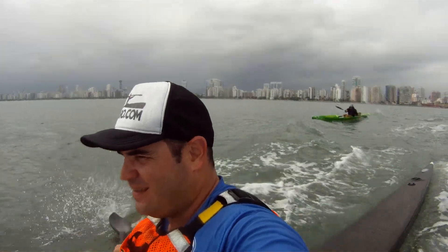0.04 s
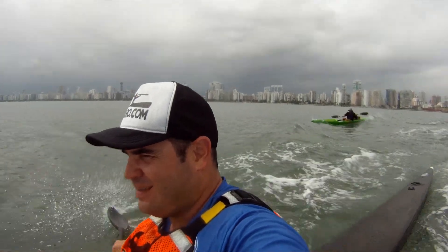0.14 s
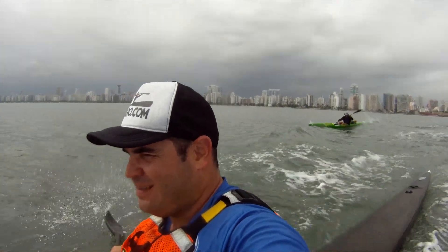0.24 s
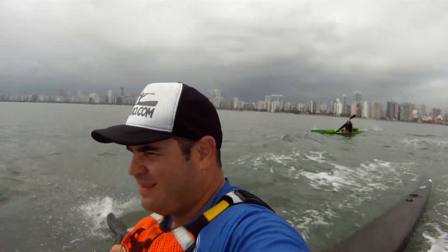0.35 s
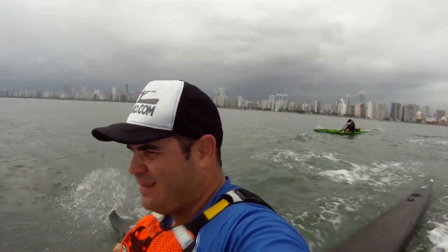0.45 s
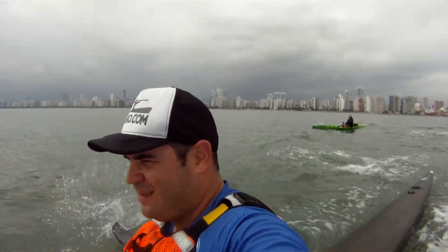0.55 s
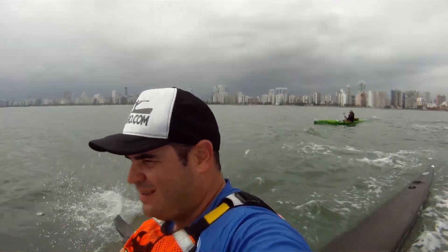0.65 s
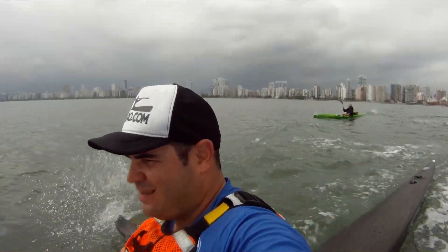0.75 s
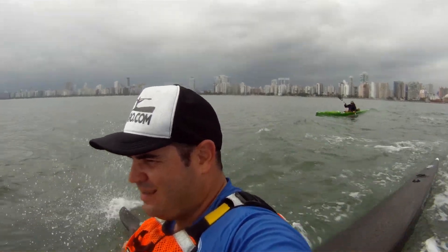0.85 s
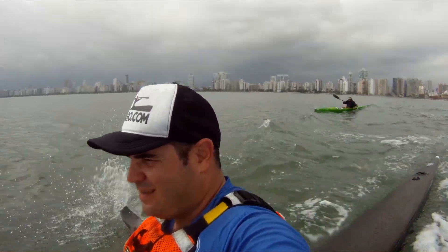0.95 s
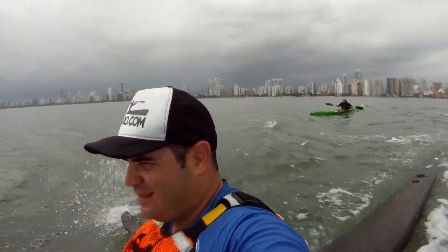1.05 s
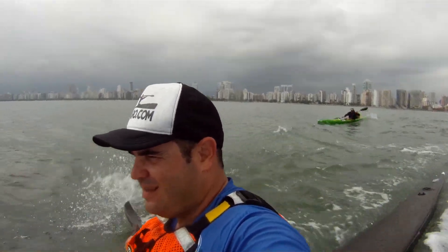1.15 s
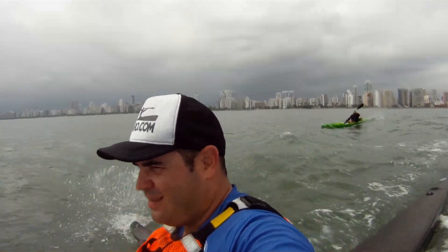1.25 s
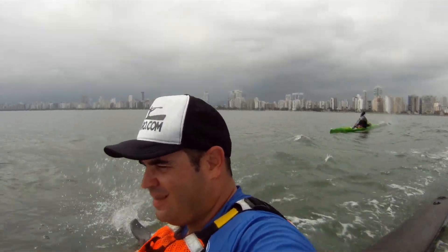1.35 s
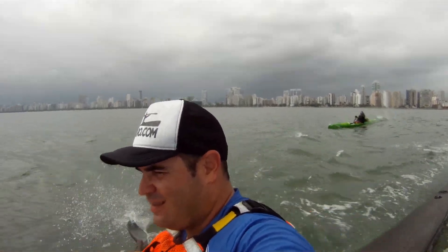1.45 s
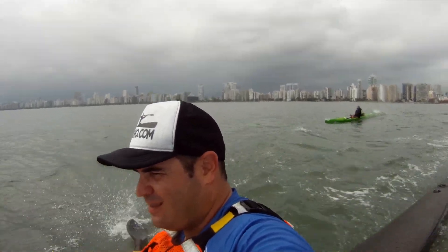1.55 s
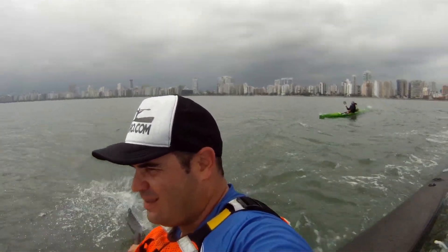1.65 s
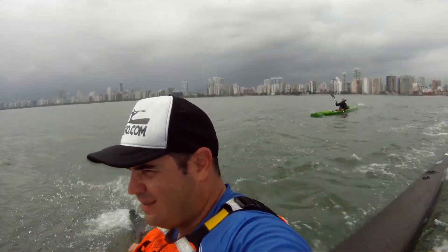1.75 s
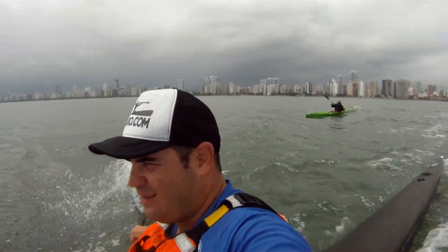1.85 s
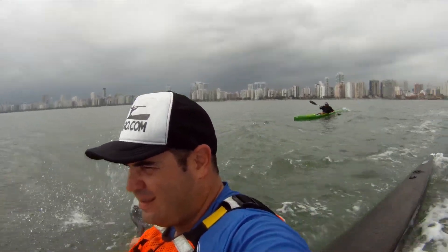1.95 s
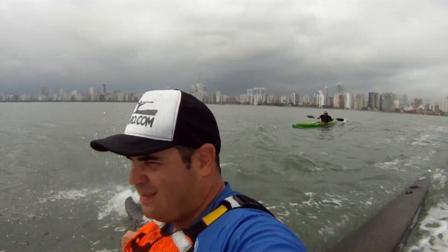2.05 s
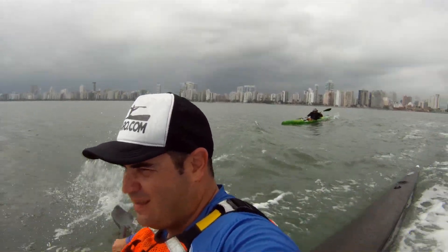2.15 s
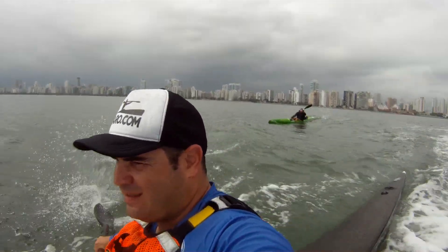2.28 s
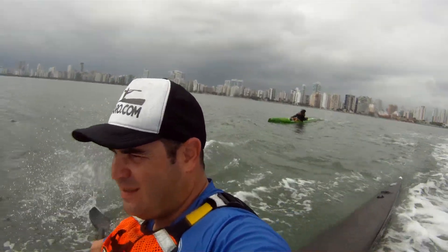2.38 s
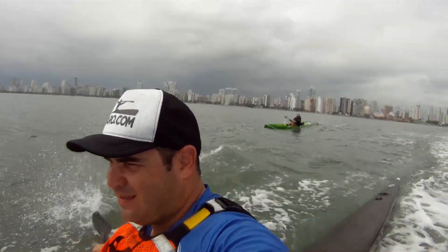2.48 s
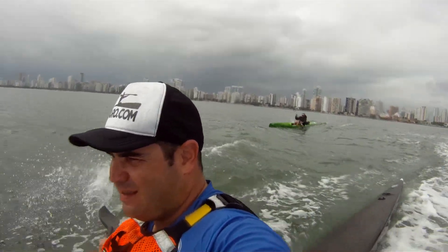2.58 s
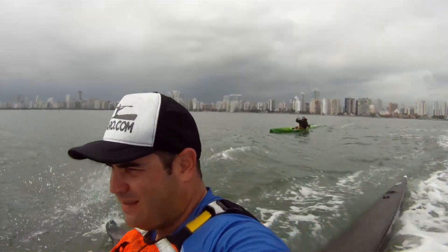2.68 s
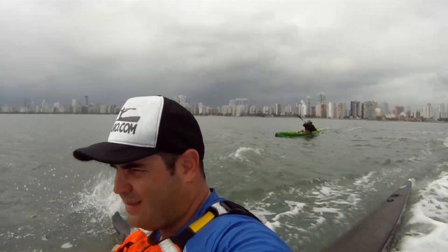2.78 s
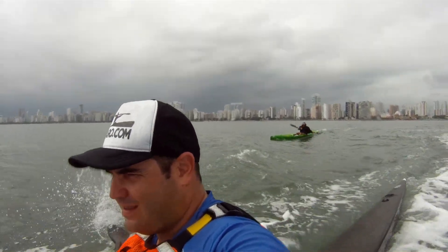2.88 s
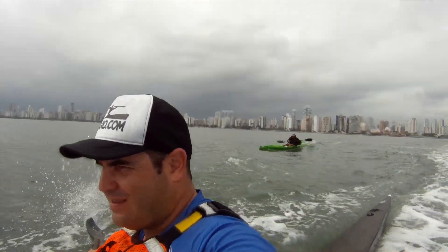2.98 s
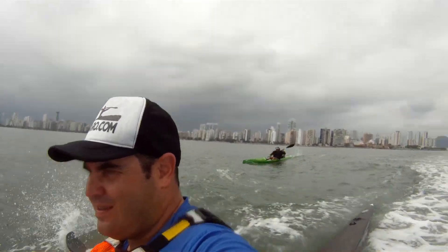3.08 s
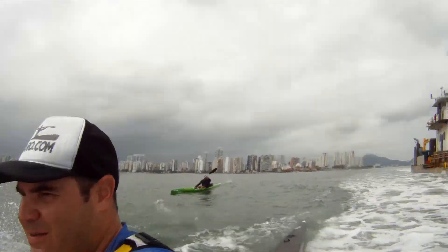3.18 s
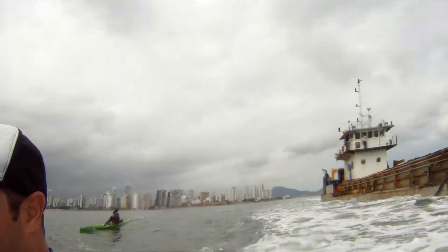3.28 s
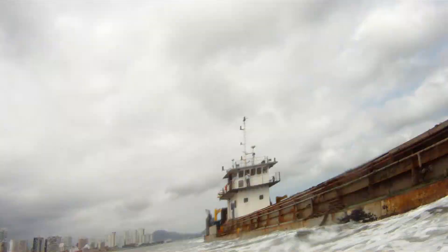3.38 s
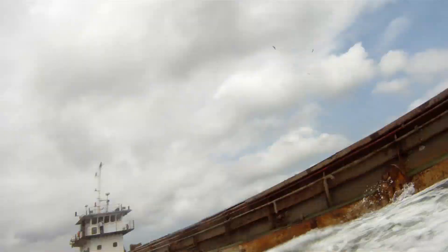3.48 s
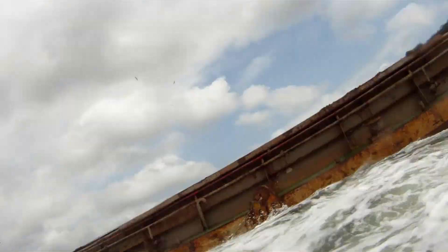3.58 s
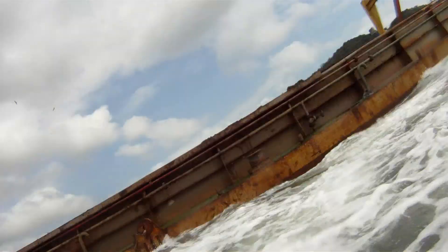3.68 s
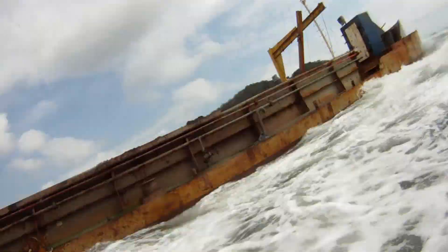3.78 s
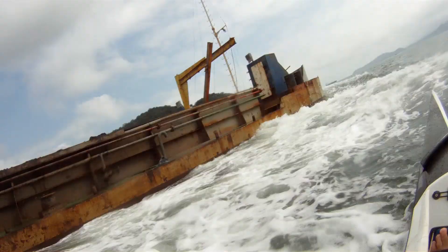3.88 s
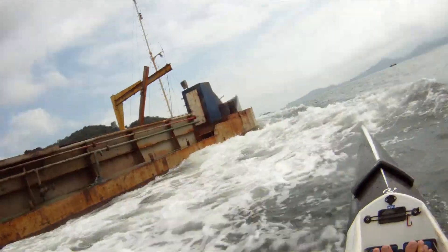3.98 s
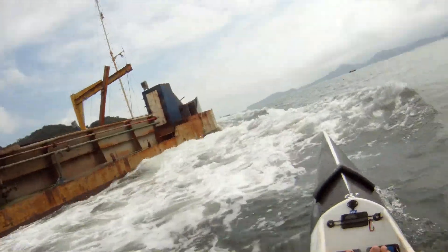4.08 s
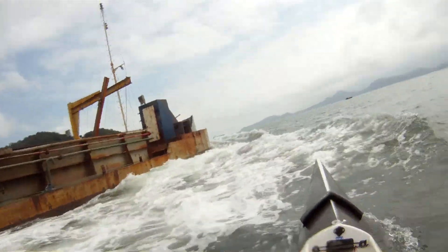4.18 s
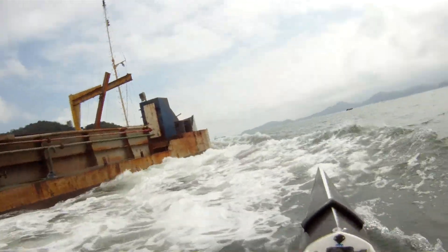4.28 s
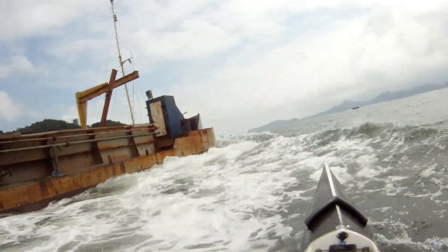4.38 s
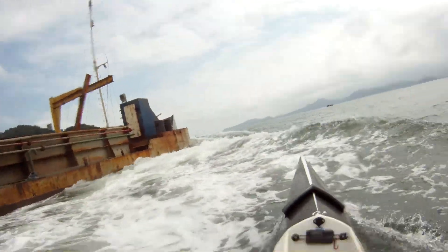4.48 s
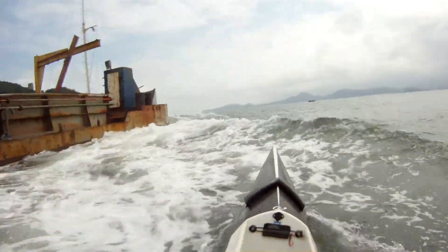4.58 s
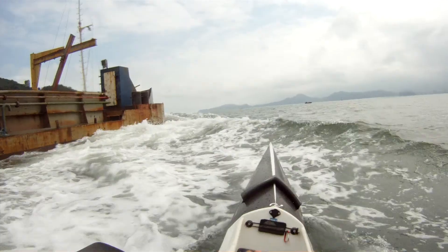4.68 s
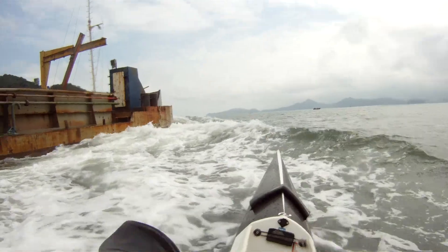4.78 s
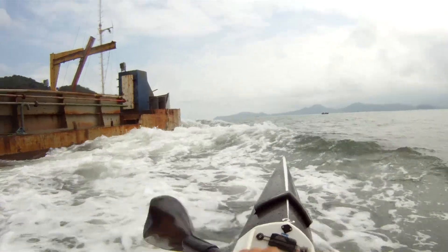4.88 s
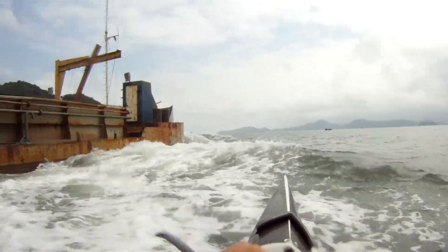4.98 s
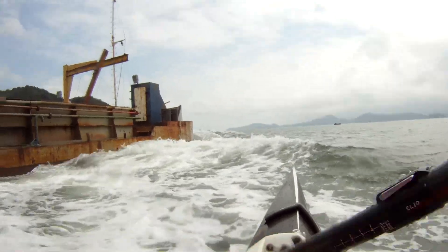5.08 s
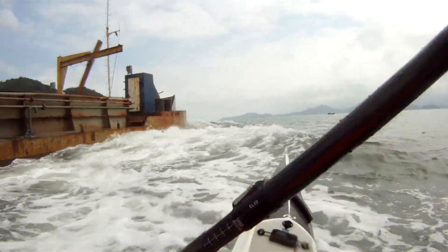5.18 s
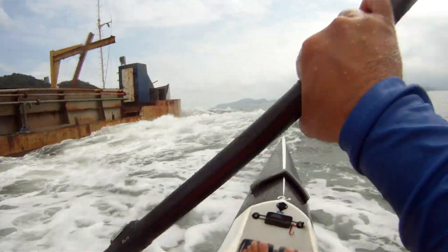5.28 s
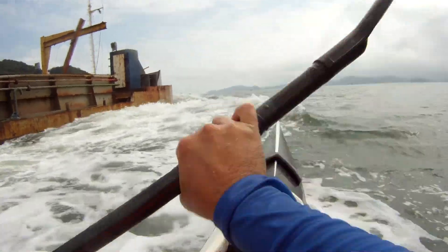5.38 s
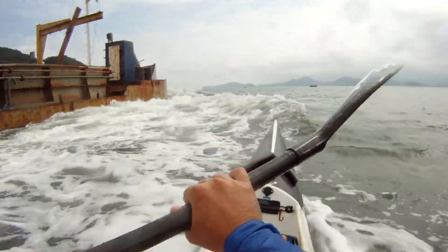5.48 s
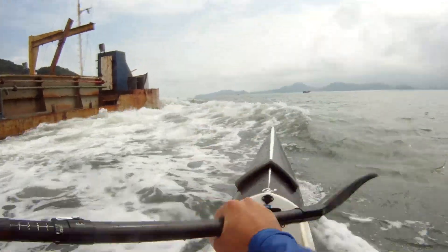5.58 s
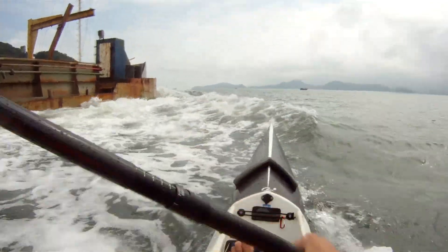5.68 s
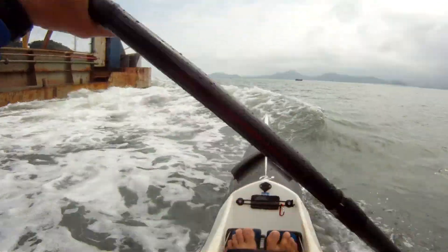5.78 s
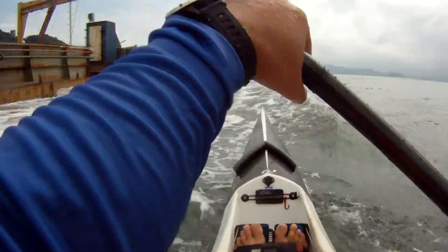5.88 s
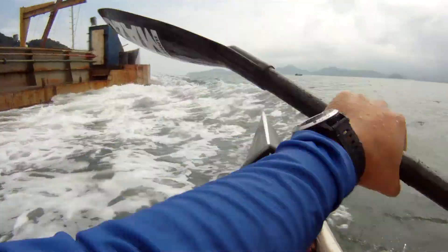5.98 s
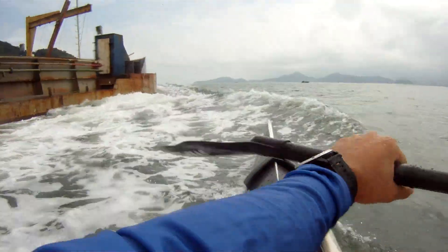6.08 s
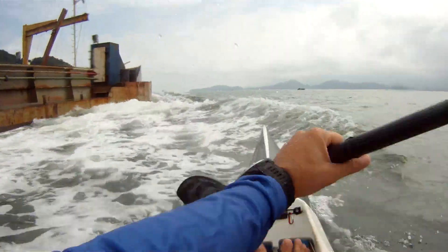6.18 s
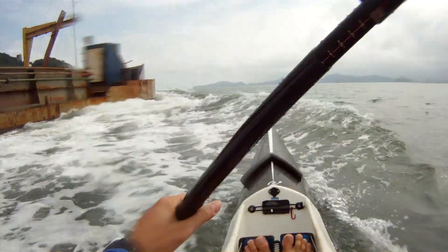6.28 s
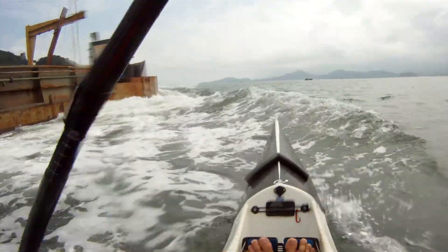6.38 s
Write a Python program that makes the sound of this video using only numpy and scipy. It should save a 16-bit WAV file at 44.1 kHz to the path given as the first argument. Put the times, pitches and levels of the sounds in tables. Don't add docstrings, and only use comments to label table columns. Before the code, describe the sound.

Boxy, rough, narrow mono sound from inside a waterproof case on a kayak. Wake foam hisses and swells, waves slosh in the hollow, spray patters, and a deep engine hum beats slowly under it. After about three seconds a cluster of sharp plastic taps strikes, then a longer rumbling bout of thumps and scuffs with a short squeak. Then mostly water again, low wind buffeting, sparse drop ticks and a slight late knock.

```python
import sys
import numpy as np
from scipy import signal
from scipy.fft import rfft, irfft
from scipy.io import wavfile

SR = 44100
rng = np.random.default_rng(int(sys.argv[2]) if len(sys.argv) > 2 else 0)


def elevation(decibels):
    levels = np.asarray(decibels, float)
    return 10 ** (levels / 20)


def materialize(psi):
    bounded = np.clip(np.atleast_2d(psi).T, -1, 1)
    quanta = np.round(bounded * 32767).astype(np.int16)
    wavfile.write(sys.argv[1], SR, quanta)


N = 284004

# start_s, level_db
GUSTS = [(0.0, -67), (1.6, -69), (2.1, -61), (3.2, -66), (3.62, -54), (4.05, -55), (4.3, -42), (4.6, -46),
         (5.4, -44), (6.0, -45), (6.44, -49)]

# multiple_of_firing, level_db
OVERTONES = [
    (1.5, -68),
    (2, -58),
]
# freq_hz, density_db
RUMBLE_SPECTRUM = [(8.8, -24), (15, 0), (27, -0.5), (59, 3), (81, -5), (168, -8), (216, -15.5),
                   (400, -18.5), (520, -23.5), (880, -120)]
# start_s, length_s, level_db
SLAMS = [
    (1.95, 0.21, -59),
    (2.63, 0.08, -62),
    (3.45, 0.34, -46),
    (4.14, 0.024, -37),
    (4.44, .04, -36),
    (5.38, 0.15, -52),
]
FIRING_HZ, FIRST_ENGINE_DB, SECOND_ENGINE_DB, BEAT_S, IN_STEP_S = 81.6, -44, -48, 3.08, 3.03
SLAM_RISE_S, SLAM_FALL_S, RUMBLE_REST_DB = 0.42, 0.29, -54

# freq_hz, width_hz, astern_db, ahead_db
CASE_MODES = [
    [(443, 430, -13, -6.5), (1647, 170, -4.5, -8.5), (1976, 380, -2, -1), (2331, 263, 1.5, 0.5),
     (2786, 150, -8.5, -10.5)],
    [(962, 380, -1, -3)],
    [(3566, 500, 2, 3), (4170, 230, -14, -1.5)],
    [(5250, 900, 13, 11.5)],
]
# freq_hz, density_db
LEAK_SPECTRUM = [(59, -22.5), (100, -1.5), (212, -12), (536, -20), (1470, -25.5), (2260, -26), (3650, -32),
                 (6000, -26), (7800, -60), (13200, -120)]
# time_s, ahead_share (0 astern, 1 ahead)
HEADING = [
    (3.1, 0),
    (4.3, 1),
]
# time_s, level_db
FOAM = [(0.0, -49), (0.72, -49), (1.5, -48.5), (2.13, -50), (2.85, -50.5), (3.19, -49), (3.45, -43.5),
        (3.6, -48.5), (4.02, -52), (4.16, -56), (4.3, -56), (4.61, -51.5), (4.88, -49.5), (5.25, -48.5),
        (5.6, -52), (5.85, -49), (6.2, -51), (6.44, -46.5)]
# start_s, length_s, level_db
WAVES = [(0.1, 0.28, -56), (1.12, 0.51, -51), (2.0, 0.28, -51), (2.65, 0.73, -51.5), (4.0, 0.29, -47.5),
         (4.72, 0.3, -55), (5.82, 0.066, -65), (6.12, 0.069, -53)]
# start_s, length_s, spray_db, mist_db
SPLASHES = [(.75, 0.29, -63.5, -95), (3.22, 0.4, -65, -64), (3.62, 0.13, -71, -68.5),
            (3.92, 0.21, -72, -65.5), (4.86, 0.26, -75, -89), (5.8, 0.068, -59, -86),
            (6.26, 0.13, -63, -69)]
LEAK_RE_FOAM_DB = -4
WAVE_RISE_S, WAVE_FALL_S, HOLLOW_REST_DB = 0.45, 0.48, -57
SPLASH_RISE_S, SPLASH_FALL_S = 0.11, 0.13
SPRAY_REST_DB, MIST_REST_DB, FOAM_MEAN_DB = -58, -72.5, -52
SPRAY_DB_PER_FOAM_DB, MIST_DB_PER_FOAM_DB = 0.77, 0.4

# start_s, lid_db, latch_db
SPECKS = [(0.629, -30, -41), (0.809, -37, -42), (0.92, -58, -41), (1.409, -31, -39.5), (1.512, -51, -40),
          (1.558, -34.5, -39), (1.692, -27, -40), (2.259, -32, -47), (2.679, -38, -43), (3.044, -31.5, -45),
          (3.129, -53, -39), (4.35, -39, -55), (4.919, -28, -39), (5.118, -37, -31.5), (5.549, -41, -39),
          (5.787, -39, -51), (5.829, -37, -42), (5.861, -37, -33.5), (5.976, -38, -44), (6.282, -49, -33),
          (6.331, -29, -50), (6.381, -38, -25.5)]
# start_s, peak_db, wall_hz, lid_re_wall_db
DRIPS = [(4.016, -29, 900, -6), (4.108, -33, 1020, -10), (2.154, -33, 1030, -0.5), (4.288, -33.5, 915, 6),
         (4.583, -37, 894, -17), (4.724, -33, 1042, 1), (4.943, -31.5, 1130, 4.5), (4.964, -32, 1090, -2),
         (4.979, -38, 940, -14), (5.001, -40.5, 835, 5), (5.042, -34, 1200, -6), (5.059, -38, 1160, -15),
         (5.083, -35, 1190, -2), (4.65, -33, 1220, -20), (4.773, -42, 1100, -2), (4.826, -31, 1090, -4),
         (4.561, -32.5, 1110, -10), (4.698, -33, 1100, -10)]
SPECK_WALL_DB, SPECK_WALL_HZ, SPECK_CONTACT_MS = -63, 1010, 2.67
DRIP_LATCH_RE_WALL_DB, DRIP_CONTACT_MS = -8, 2.7

# start_s, length_s, wall_db, lid_db
GRIP = [(2.058, 0.023, -45, -62), (3.664, 0.049, -51, -35.5), (3.735, 0.022, -39.5, -42),
        (4.012, 0.0069, -47, -33), (4.062, .006, -47, -44), (4.095, .004, -32, -61),
        (4.133, 0.02, -38, -42), (4.217, 0.025, -36, -37.5), (4.353, 0.0043, -46, -40.5),
        (4.38, 0.013, -38.5, -65), (4.443, 0.059, -26, -37), (4.72, .008, -42.5, -47),
        (4.765, 0.0052, -42.5, -59), (6.309, 0.044, -83, -42.5), (6.385, 0.0079, -50, -42)]
# start_s, length_s, level_db
HEAVE = [(4.022, .006, -33), (4.104, 0.029, -21), (4.222, .035, -23.5), (4.445, .015, -10),
         (4.8, 0.035, -28), (3.735, .03, -33.5)]
GRIP_RISE_S, GRIP_FALL_S, GRIP_LATCH_RE_LID_DB = 0.035, 0.055, -11
HEAVE_RISE_S, HEAVE_FALL_S = 0.04, 0.1

# start_s, peak_db, push_ms, swing_back_ms
THUMPS = [(3.312, -22.5, 0.79, 3.9), (3.392, -8.5, 0.4, 5), (3.447, -14, 0.95, 3.5), (3.464, -15, 2, 2.7),
          (3.483, -12.5, 0.66, 3.1), (3.589, -20.5, 1.3, 2.1), (3.842, -26, 2, 7.7),
          (4.018, -22.5, 2.4, 3.2), (4.11, -13, 1.5, 7), (4.133, -38, 1.7, 8.3), (4.436, -11.5, 1.4, 9.6),
          (4.448, -10, 2.7, 12), (4.475, -31, 0.68, 6.0), (4.499, -11.5, 3.1, 8.4),
          (4.561, -16.5, 0.57, 6.2), (4.652, -16, 0.7, 5.5), (4.698, -14.5, 0.67, 5.2),
          (4.74, -27.5, 1, 7.5), (4.772, -26.5, 1, 4.5), (4.81, -23, 0.18, 4.5), (4.827, -21, 0.91, 5.9),
          (6.268, -26.5, 0.34, 3.4)]
PUSH_ROUNDNESS, LET_GO_SPEED = 1.6, 0.78

# start_s, peak_db, start_hz, end_hz, fade_ms, octave_db
SQUEAKS = [
    (4.1585, -3.5, 1197, 765, 5.7, -17),
]

# start_s, peak_db, wall_hz, lid_re_wall_db, contact_ms
TAPS = [(3.311, -6, 1166, -12.5, 4.6), (3.39, 1.5, 1230, -14.5, 1.8), (3.447, -1.5, 1170, -8, 3.25),
        (3.465, -7, 1190, -10, 6.2), (3.483, -2.5, 1210, -4, 2.7), (4.13, -18, 970, -24, 1.8),
        (4.476, -5.5, 1000, -11, 0.57), (4.509, 0.5, 1170, -12.5, 4.2), (4.817, -18.5, 1020, -0.5, 0.61),
        (6.268, -23.5, 1110, 6, 1.3)]
# start_s, peak_db, wall_hz, lid_re_wall_db, contact_ms
SCUFFS = [(4.014, -35, 850, -12, 7.0), (4.081, -23, 970, 11.5, 5.6), (4.253, -0.5, 940, 5.5, 6.6),
          (4.394, -18, 770, -12, 8.5), (4.412, -8.5, 1050, -3, 3.17), (4.443, -16, 940, -7.5, 8.5),
          (4.486, -13, 980, -6.5, 5.8), (4.687, -34.5, 830, 9.5, 5.9), (4.762, -26.5, 1120, -3.5, 3.2),
          (4.884, -32.5, 1130, 5.5, 11),
          (3.375, -39.5, 1080, 7.5, 14), (3.568, -44.5, 1220, 16, 11), (3.5863, -1.5, 1225, -5, 9.3),
         (3.597, -9.5, 1190, 2.5, 8.1), (3.61, -24.5, 1320, -1.5, 10.4), (4.086, -21, 880, 2.5, 1.9),
         (4.170, -10, 920, -10, 9.7), (4.265, -38, 894, 18, 3.8), (4.493, -24.5, 935, 7.5, 1.7),
         (6.253, -56, 1095, 17.5, 4.5), (4.160, -22.5, 1000, 6.5, 12)]
TAP_T60_S, TAP_UNDER_DB, SCUFF_T60_S = 0.009, -5, 0.013
TAP_LATCH_DB = -51
SCUFF_LATCH_DB, LATCH_DB_PER_LID_DB = -10.5, 1.54

HOLD_HZ, BAND_HZ, CUTOFF_HZ = 12000, 5500, 15300


def rms_one(x):
    return x / np.sqrt(np.mean(x ** 2) + 1e-20)


def in_time(rows, outside=None):
    time_s, *columns = np.transpose(rows)
    return [np.interp(np.arange(N) / SR, time_s, c, outside, outside) for c in columns]


def drift(rate_hz):
    knots = rng.standard_normal(int(N / SR * 60) + 3)
    return np.interp(np.arange(N) / SR * min(rate_hz, 60), np.arange(len(knots)), knots)


def coloured(spectrum):
    hz = np.maximum(np.arange(N // 2 + 1) * SR / N, 1)
    points_hz, points_db = np.array(spectrum).T
    shape_db = np.interp(np.log(hz), np.log(points_hz), points_db)
    return rms_one(irfft(rfft(rng.standard_normal(N)) * elevation(shape_db), N))


def resonance(x, hz, width_hz):
    r = np.exp(-np.pi * width_hz / SR)
    poles = [1, -2 * r * np.cos(2 * np.pi * hz / SR), r * r]
    return signal.lfilter([(1 - r * r) / 2, 0, (r * r - 1) / 2], poles, x)


def band(x, low_hz, high_hz):
    return signal.sosfilt(signal.butter(3, [low_hz, high_hz], "band", fs=SR, output="sos"), x)


def swells(rows, rise_s, fall_s):
    out = 0
    for s, length_s, *levels_db in rows:
        corners = [(s - rise_s, -40), (s, 0), (s + length_s, 0), (s + length_s + fall_s, -40)]
        shape_db, = in_time(corners, outside=-120)
        out = out + elevation(np.add.outer(levels_db, shape_db))
    return out


def fizz(per_s, spread_db, share):
    sizes = elevation(spread_db * np.minimum(rng.exponential(1, N), 4)) * rng.choice([-1, 1], N)
    pops = rms_one(sizes * (rng.random(N) < per_s / SR))
    return rng.standard_normal(N) + share * pops


def wind():
    level_db = in_time(GUSTS)[0] + 0.8
    return elevation(level_db) * coloured([(3, -10), (11, 0), (22, -9), (35, -30), (70, -70)])


def engine():
    phase = 2 * np.pi * np.cumsum(FIRING_HZ + 0.51 * drift(5.1)) / SR
    lead = np.pi * (np.arange(N) / SR - IN_STEP_S) / BEAT_S
    first = elevation(FIRST_ENGINE_DB) * np.sin(phase - lead)
    second = elevation(SECOND_ENGINE_DB) * np.sin(phase + lead)
    overtones = sum(elevation(db + 1.1 * drift(9.8)) * np.sin(k * phase) for k, db in OVERTONES)
    rumble_gain = elevation(RUMBLE_REST_DB + 1.5 * drift(12)) + swells(SLAMS, SLAM_RISE_S, SLAM_FALL_S)[0]
    rumble = elevation(2.0) * rumble_gain * coloured(RUMBLE_SPECTRUM)
    return np.sqrt(2) * (first + second) + overtones + rumble


def sea_gains():
    foam_db, = in_time(FOAM)
    swing_db = foam_db - FOAM_MEAN_DB
    hollow = elevation(HOLLOW_REST_DB) + swells(WAVES, WAVE_RISE_S, WAVE_FALL_S)[0]
    spray, mist = swells(SPLASHES, SPLASH_RISE_S, SPLASH_FALL_S)
    spray = spray + elevation(SPRAY_REST_DB + SPRAY_DB_PER_FOAM_DB * swing_db)
    mist = mist + elevation(MIST_REST_DB + MIST_DB_PER_FOAM_DB * swing_db)
    return [elevation(foam_db), hollow, spray, mist]


def wake():
    gains = sea_gains()
    ahead, = in_time(HEADING)
    swell_db_free = 0.65 * drift(23) + 1.1 * drift(40)
    out = elevation(LEAK_RE_FOAM_DB) * gains[0] * coloured(LEAK_SPECTRUM)
    for gain, group in zip(gains, CASE_MODES):
        for hz, width_hz, astern_db, ahead_db in group:
            bubbles = fizz(per_s=900, spread_db=8.0, share=0.48)
            ringing = resonance(resonance(bubbles, hz, width_hz * 1.36), hz, width_hz * 1.36)
            level_db = astern_db + ahead * (ahead_db - astern_db) - 4.5
            out = out + gain * elevation(level_db + 2.2 * drift(20)) * rms_one(ringing)
    return elevation(swell_db_free) * out


def blows(rows, grit, t60_s, under_db, over_db, kick, rise_ms, floor_hz):
    out, t = np.zeros(N + 4096), np.arange(2048) / SR
    for s, peak_db, wall_hz, lid_db, latch_db, contact_ms in rows:
        chance, noise = rng.random(8), rng.standard_normal(2048)
        fade = np.exp(-(t * 1000 / max(contact_ms, 0.3)) ** 3)
        contact = noise * grit * fade * (1 - np.exp(-t * 1000 / rise_ms))
        contact[0] = kick
        wall = [(wall_hz, 0), (wall_hz * 0.86, under_db), (wall_hz * 1.155, over_db)]
        lid = [(2126, 43), (1870, -31), (2217, 0)]
        latch = [(3620, 64), (4300, -57)]
        parts = [(wall, 0, floor_hz, 2000), (lid, lid_db, 1400, 2900), (latch, latch_db, 3000, 5400)]
        at = round(s * SR)
        for modes, part_db, low_hz, high_hz in parts:
            ring = sum(elevation(db - 60 * t / t60_s) * np.sin(2 * np.pi * hz * t) * (0.5 + chance[j])
                       for j, (hz, db) in enumerate(modes))
            struck = band(np.convolve(contact, ring)[:2048], low_hz, high_hz)
            out[at:at + 2048] += elevation(peak_db + part_db) * struck / np.abs(struck).max()
    return out[:N]


def drops():
    specks = [(s, SPECK_WALL_DB, SPECK_WALL_HZ, lid_db - SPECK_WALL_DB, latch_db - SPECK_WALL_DB,
               SPECK_CONTACT_MS) for s, lid_db, latch_db in SPECKS]
    drips = [(s, db, hz, lid_db, DRIP_LATCH_RE_WALL_DB, DRIP_CONTACT_MS) for s, db, hz, lid_db in DRIPS]
    return blows(specks + drips, grit=0.92, t60_s=0.0076, under_db=-41, over_db=-16,
                 kick=2.5, rise_ms=0.4, floor_hz=640)


def grip():
    slips = fizz(per_s=400, spread_db=4, share=0.9) * elevation(2.5 * drift(55))
    wall = rms_one(band(resonance(slips, 866, 380), 340, 2100))
    lid = rms_one(resonance(band(slips, 1700, 3200), 2410, 390))
    latch = rms_one(band(slips, 2040, 7800))
    heave_noise = coloured([(20, 6), (55, 7.0), (90, -1.5), (180, -9), (400, -18), (1000, -57)])
    heave = swells(HEAVE, HEAVE_RISE_S, HEAVE_FALL_S)[0] * elevation(-2.5) * heave_noise
    on_wall, on_lid = swells(GRIP, GRIP_RISE_S, GRIP_FALL_S)
    return heave + on_wall * wall + on_lid * (lid + elevation(GRIP_LATCH_RE_LID_DB) * latch)


def thumps():
    out, ms = np.zeros(N + 1024), np.arange(1024) / SR * 1000
    for s, peak_db, push_ms, back_ms in THUMPS:
        since_ms = ms - 2 * push_ms
        speed = np.where(since_ms > 0, LET_GO_SPEED, 1)
        push = np.exp(-np.abs(since_ms / push_ms * speed) ** PUSH_ROUNDNESS)
        back = (since_ms > 0) * (1 - push) * np.exp(-(since_ms / back_ms) ** 2)
        at = round((s - push_ms / 1000) * SR)
        out[at:at + 1024] += elevation(peak_db) * (push - back * push.sum() / back.sum())
    return out[:N]


def squeaks():
    out, ms = np.zeros(N), np.arange(1500) / SR * 1000
    for s, peak_db, start_hz, end_hz, fade_ms, octave_db in SQUEAKS:
        pitch_hz = end_hz + (start_hz - end_hz) * np.exp(-ms / 7.0)
        phase = 2 * np.pi * np.cumsum(pitch_hz) / SR
        shape = ms / fade_ms * np.exp(1 - ms / fade_ms * 1.71) * 1.42
        tone = np.sin(phase) + elevation(octave_db) * np.sin(2 * phase)
        at = round(s * SR)
        out[at:at + 1500] += elevation(peak_db) * shape * tone
    return out


def hands():
    taps = [(s, db, hz, lid_db, TAP_LATCH_DB - db, ms) for s, db, hz, lid_db, ms in TAPS]
    scuffs = [(s, db, hz, lid_db, SCUFF_LATCH_DB + LATCH_DB_PER_LID_DB * lid_db, ms)
              for s, db, hz, lid_db, ms in SCUFFS]
    tapping = blows(taps, grit=0.49, t60_s=TAP_T60_S, under_db=TAP_UNDER_DB, over_db=-45.0,
                    kick=4.0, rise_ms=0.21, floor_hz=526)
    scuffing = blows(scuffs, grit=1.8, t60_s=SCUFF_T60_S, under_db=-43.0, over_db=-24.0,
                     kick=2.2, rise_ms=1.1, floor_hz=723)
    return tapping + scuffing


def scene():
    background = wind() + engine() + wake() + drops()
    handling = grip() + thumps() + squeaks() + hands()
    return (background + handling)[None]


def gain_control(x, above_db, share, memory_s):
    r = np.exp(-1 / (memory_s * SR))
    power = signal.lfilter([(1 - r) ** 2], [1, -2 * r, r * r], x ** 2)
    level_db = 10 * np.log10(power + 1e-12)
    return x * elevation(-share * np.maximum(level_db - above_db, 0))


def top_cut(x):
    return signal.sosfilt(signal.butter(12, 15740, fs=SR, output="sos"), x)


def record(dry):
    levelled = gain_control(dry, above_db=-18, share=0.57, memory_s=0.021)
    clipped = np.clip(levelled, -0.97, 0.97)
    narrow = signal.sosfilt(signal.butter(8, BAND_HZ, fs=SR, output="sos"), clipped)
    sampled = signal.resample_poly(narrow, HOLD_HZ // 300, SR // 300, axis=1)
    steps = np.repeat(sampled, 4, axis=1)
    held = signal.resample_poly(steps, 147, 160, axis=1)[:, 6:N + 6]
    held = np.pad(held, [(0, 0), (0, N - held.shape[1])])
    low_pass = signal.cheby2(10, 30, CUTOFF_HZ + 250, fs=SR, output="sos")
    mix = signal.sosfiltfilt(low_pass, held)
    return top_cut(mix)


dry = scene()
out = record(dry)
materialize(out)
```